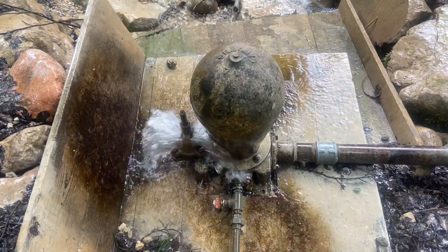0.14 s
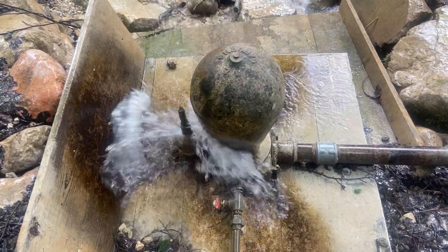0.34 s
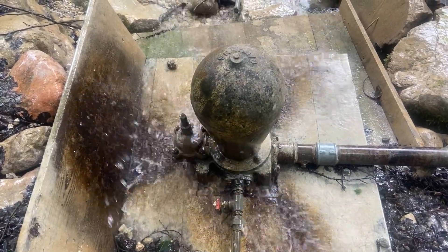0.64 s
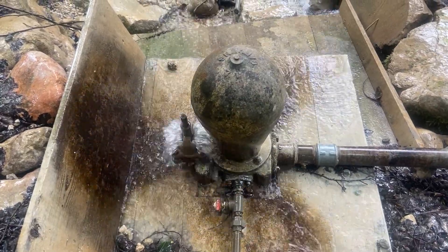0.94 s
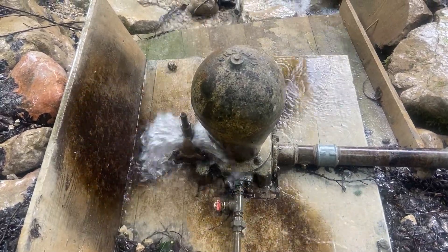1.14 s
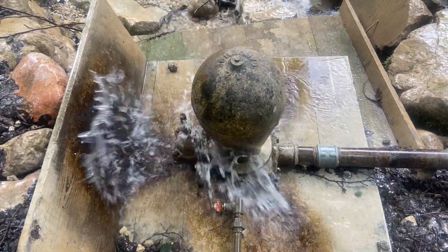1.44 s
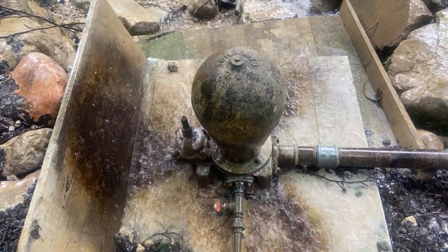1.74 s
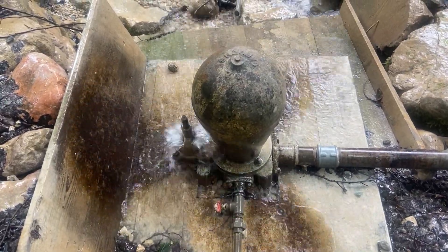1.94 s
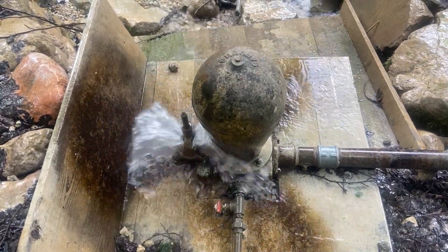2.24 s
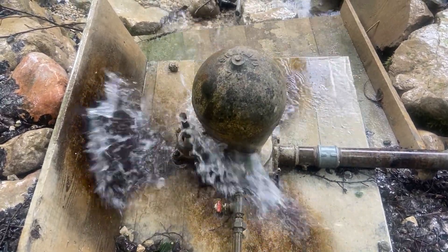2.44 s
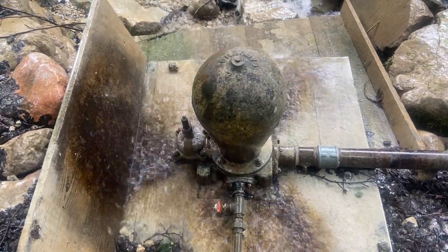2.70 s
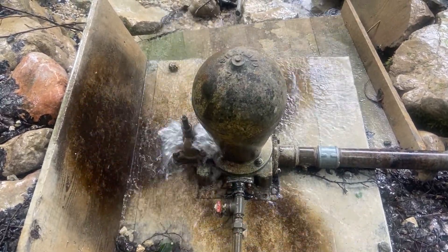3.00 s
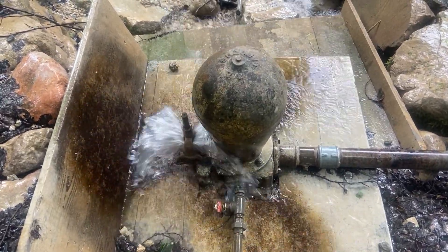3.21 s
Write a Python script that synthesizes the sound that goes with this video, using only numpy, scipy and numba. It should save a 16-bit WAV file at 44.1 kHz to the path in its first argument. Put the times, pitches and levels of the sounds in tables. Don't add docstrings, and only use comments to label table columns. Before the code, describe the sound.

A water ram pump knocks at about 0.34, 1.35 and 2.36 seconds: a chattering iron crack, short clanky ring, low board thud swelling just behind, and a duller rebound under a tenth of a second later. Spray patters after each slam; the gush dips, then builds from half a second on. Bright drops tick, small bubbles chirp, and a brook rushes steadily over low pipe rumble. Close, bright stereo phone pickup outdoors.

```python
import sys
import numpy as np
from scipy import signal
from scipy.fft import rfft, irfft
from scipy.io import wavfile
from scipy.ndimage import uniform_filter1d
from numba import njit

SR = 44100
rng = np.random.default_rng(int(sys.argv[2]) if len(sys.argv) > 2 else 0)


def volts_from_db(level):
    exponent = np.asarray(level, float) / 20
    return 10 ** exponent


def int16_out(signal):
    q = np.round(np.clip(np.atleast_2d(signal).T, -1, 1) * 32767)
    wavfile.write(sys.argv[1], SR, q.astype(np.int16))


N = 148176

# frequency in Hz, level in dB per Hz.
BROOK_SPECTRUM = [(25, -35), (62, -12.5), (140, -2), (330, -12), (700, -5), (1400, -9.5), (3500, -17),
                  (16000, -24.5)]
# frequency in Hz, width in Hz, level in dB.
PIPE_RUMBLE = [(68.9, 11, -45.5), (134, 32, -44.5)]
# start in seconds, peak in dB, frequency in Hz.
DROPS = [(0.0617, -26.5, 7110), (0.0957, -23, 6430), (0.2726, -22.5, 7430), (0.5646, -25, 6400),
         (0.7289, -26, 7400), (1.755, -18.5, 5300), (1.7893, -35, 6320), (2.0747, -32, 7740),
         (2.151, -26.5, 7000), (2.6512, -28, 7700), (2.6817, -26.5, 6700), (2.7142, -22, 7200),
         (2.838, -27, 6050), (3.2171, -26.5, 7280)]
# start in seconds, level in dB, frequency in Hz.
BUBBLES = [
    (.80, -37, 900),
    (1.43, -33, 3000),
    (1.78, -34, 750),
    (1.945, -34, 1080),
    (2.915, -36, 1100),
    (3.062, -31, 2030),
]
# start in seconds, level in dB, rebound in dB, iron in dB.
CLOSINGS = [
    (.338, -14.5, -11.5, -7),
    (1.346, -15.5, -11.5, -8),
    (2.358, -15.5, -11.5, -5.5),
]
# delay in seconds, level in dB.
CHATTER = [
    (0, 0),
    (.007, 4),
    (.024, -2),
    (.039, -8),
]
# frequency in Hz, level in dB, rise in seconds, T60 in seconds.
BOARD_MODES = [(67.7, -18, 0.014, 0.85), (119, -8.5, 0.029, 0.36), (145.9, -3, 0.027, 0.25),
               (184.8, -3.5, 0.01, 0.27), (244, -3, 0.025, 0.033), (328, -3, 0.01, 0.066),
               (451.7, -3.5, 0.005, .12), (596, -7.5, 0.01, 0.064), (681, 0, 0.0072, 0.05),
               (726, -1, 0.0077, 0.076)]
# frequency in Hz, level in dB, T60 in seconds.
IRON_MODES = [(887, -5, 0.06), (936, -2.5, 0.11), (1228, 1, 0.038), (1283, -0.5, 0.041),
              (1427, -3.5, 0.035), (1788, -5, 0.055), (1874, -9.5, 0.063), (2083, -3.5, 0.027),
              (2504, -8.5, 0.042), (2916, -12, 0.066), (3070, -13, 0.023), (4730, -19.5, 0.09)]
# frequency in Hz, gain in dB.
MIC = [(40, -2.5), (2800, -0.5), (3700, 0), (5000, 4.5), (7500, 11), (8600, 12.5), (10000, 1.5),
       (14500, -6.5)]
# frequency in Hz, phase in radians.
LEAD = [(3000, 0), (6300, -.3), (7200, 1.2), (8800, 3.1), (9700, 3.2), (11000, 6.2), (13400, 6.4),
        (15000, 9.4)]
# frequency in Hz, phase in radians.
WATER_LEAD = [(200, 0), (780, -.7), (1400, -3.1), (2000, -6.1), (3600, -6.4)]
# frequency in Hz, correlation from 0 to 1.
LIKENESS = [(60, 1), (250, 0.91), (700, 0.59), (1400, 0.34), (2800, 0.78), (5000, 0.3), (8500, 0.99),
            (13000, 0.28)]
# frequency in Hz, difference in dB.
LEFT_DB = [(200, -1.4), (600, -2.5), (1200, 0), (2500, -.8), (6000, 0)]

BROOK_DB, PLOP_DB, GURGLE_DB, GUSH_DB, SPRAY_DB = -35, -44.5, -42.5, -39.5, -40
CYCLE_S, GUSH_OPENS_S, GUSH_RISE_S, GUSH_FADE_S = 0.98, 0.5, 0.3, 0.27
SPRAY_PEAK_S, SPRAY_FLOOR_DB, WOBBLE_DB = 0.13, 1.5, 0.9
DROP_DB = -13
REBOUND_S, REBOUND_TILT_DB_PER_OCT, REBOUND_SOFTENING = 0.087, -1, 1.5
IRON_RISE_S, VARY_DB = 0.0025, 1.5
CRACK_DB, CRACK_T60_S = -4.5, 0.07
THUD_DB, THUD_RISE_S, THUD_T60_S, SHAKE_DB = -12, 0.018, 0.4, -10


def level(x, db):
    return x * volts_from_db(db) / np.sqrt(np.mean(x ** 2))


def curve(table, hz):
    table = np.array(table, float)
    return np.interp(np.log(hz + 1e-9), np.log(table[:, 0]), table[:, 1])


@njit
def svf(x, hz, width_hz):
    y, band, low = np.empty(len(x)), 0., 0.
    g, k = np.tan(np.pi * hz / SR), width_hz / hz
    for i in range(len(x)):
        v = (band + g * (x[i] - low)) / (1 + g * (g + k))
        band, low, y[i] = 2 * v - band, low + 2 * g * v, k * v
    return y


def band_noise(hz, width_hz):
    return svf(rng.standard_normal(N), float(hz), float(width_hz))


@njit
def rings(at_s, hz, size, t60_s, rise_s, glide, n):
    y = np.zeros(n)
    for e in range(len(at_s)):
        i, phase = int(at_s[e] * SR), 0.
        for j in range(min(int((t60_s[e] + rise_s[e]) * SR), n - i)):
            t = j / SR
            u = min(t / rise_s[e], 1.)
            phase += 2 * np.pi * hz[e] * (1 + glide * t / t60_s[e]) / SR
            if i + j >= 0:
                decay = np.exp(-6.9 * max(t - rise_s[e], 0.) / t60_s[e])
                y[i + j] += size[e] * u * u * (3 - 2 * u) * decay * np.sin(phase)
    return y


def walk(rate_hz):
    k = int(SR / rate_hz)
    steps = np.repeat(rng.standard_normal(N // k + 1), k)
    return 1.3 * uniform_filter1d(uniform_filter1d(steps, k), k)[:N]


def grains(count, lo_hz, hi_hz, cycles, scatter_db, glide, flow):
    when, pitch, rarity, sign = rng.random((count, 4)).T
    at_s, hz = when * (N - 1) / SR, lo_hz * (hi_hz / lo_hz) ** pitch
    size = volts_from_db(-scatter_db * np.log(rarity + 0.0075)) * flow[(at_s * SR).astype(int)] * np.sign(sign - .5)
    return rings(at_s, hz, size, cycles / hz, 1 / hz, glide, N)


def since_closing():
    t = np.arange(N) / SR
    first_s = CLOSINGS[0][0]
    at_s = np.array([first_s - 2 * CYCLE_S, first_s - CYCLE_S] + [row[0] for row in CLOSINGS])
    return t - at_s[np.searchsorted(at_s, t, side="right") - 1]


def after(at_s):
    return np.maximum(np.arange(N) / SR - at_s, 0)


def brook():
    rush, swell = 0, walk(1.4)
    for hz in 25 * 2 ** np.arange(0, 9.4, 1 / 3):
        gain = volts_from_db(curve(BROOK_SPECTRUM, hz) + 0.3 * swell + 1.1 * walk(25.1))
        rush = rush + gain * svf(band_noise(hz, hz / 3), hz, hz / 2)
    rumble = sum(level(band_noise(hz, width_hz), db) for hz, width_hz, db in PIPE_RUMBLE)
    return level(rush, BROOK_DB) + rumble


def plops():
    flow = volts_from_db(1.8 * walk(9.7))
    return level(grains(260, 519.0, 5930.0, cycles=54.0, scatter_db=3.0, glide=0.19, flow=flow), PLOP_DB)


def gurgle():
    flow = volts_from_db(0.7 * walk(4.63))
    return level(grains(1200, 240.0, 1297.0, cycles=18., scatter_db=1.5, glide=0.32, flow=flow), GURGLE_DB)


def gush():
    t = since_closing()
    build = 1 - np.exp(-np.maximum(t - GUSH_OPENS_S, 0) / GUSH_RISE_S)
    flow = (build + np.exp(-t / GUSH_FADE_S)) * volts_from_db(2.1 * WOBBLE_DB * walk(25))
    return level(grains(8000, 752.0, 3500., cycles=8.0, scatter_db=5.0, glide=0.13, flow=flow), GUSH_DB)


def spray():
    t = since_closing()
    burst = t / SPRAY_PEAK_S * np.exp(1 - t / SPRAY_PEAK_S) + volts_from_db(SPRAY_FLOOR_DB)
    flow = burst * volts_from_db(WOBBLE_DB * walk(25))
    return level(grains(20000, 2965.0, 16700.0, cycles=6.7, scatter_db=2.6, glide=0.13, flow=flow), SPRAY_DB)


def water():
    return brook() + plops() + gurgle() + gush() + spray()


def drops():
    at_s, db, hz = np.repeat(np.array(DROPS, float), 9, axis=0).T
    lag, detune = rng.standard_normal((len(at_s), 2)).T
    at_s, hz = at_s + 0.00065 * abs(lag), hz * np.exp(0.157 * detune)
    return rings(at_s, hz, volts_from_db(db + DROP_DB), 0 * at_s + 0.014, 0 * at_s + 0.00066, 0.085, N)


def bubbles():
    at_s, db, hz = np.array(BUBBLES, float).T
    return rings(at_s, hz, volts_from_db(db), 0 * at_s + .08, 0 * at_s + .008, .06, N)


def shocks():
    out = []
    for at_s, db, back_db, iron_db in CLOSINGS:
        out.append((at_s, db, iron_db, 0, 1))
        out.append((at_s + REBOUND_S, db + back_db, iron_db, REBOUND_TILT_DB_PER_OCT, REBOUND_SOFTENING))
    return out


def thud():
    envelope = np.zeros(N)
    for at_s, db, _, _ in CLOSINGS:
        t = after(at_s)
        envelope += volts_from_db(db - 60 * t / THUD_T60_S) * (1 - np.exp(-(t / THUD_RISE_S) ** 2))
    low = level(svf(band_noise(163, 230), 163.0, 230.0), 0)
    return volts_from_db(THUD_DB) * envelope * (low + level(band_noise(560, 760), SHAKE_DB))


def crack():
    envelope = np.zeros(N)
    for at_s, db, _, tilt, _ in shocks():
        for lag_s, hit_db in CHATTER:
            t = after(at_s + lag_s)
            envelope += volts_from_db(db + hit_db + 6.5 * tilt) * (t > 0) * volts_from_db(-60 * t / CRACK_T60_S)
    return volts_from_db(CRACK_DB) * envelope * (band_noise(1500, 2800) + volts_from_db(-12) * band_noise(9700, 4000))


def boards_and_iron(vary_db, turn_cycles):
    rows = []
    for at_s, db, iron_db, tilt, soft in shocks():
        for hz, mode_db, rise_s, t60_s in BOARD_MODES:
            rows.append((at_s, hz, db + mode_db + tilt * np.log2(hz / 150), t60_s, rise_s * soft))
        for lag_s, hit_db in CHATTER:
            for hz, mode_db, t60_s in IRON_MODES:
                ring_db = db + hit_db + mode_db + iron_db + tilt * np.log2(hz / 150)
                rows.append((at_s + lag_s, hz, ring_db, t60_s, IRON_RISE_S * soft))
    at_s, hz, db, t60_s, rise_s = np.array(rows).T
    detune, vary, turn = rng.standard_normal((len(rows), 3)).T
    at_s = at_s + turn_cycles * turn / hz
    return rings(at_s, hz * (1 + 0.0075 * detune), volts_from_db(db + vary_db * vary), t60_s, rise_s, 0., N)


def knocks(vary_db, turn_cycles):
    return boards_and_iron(vary_db, turn_cycles) + crack() + thud()


def ports(same, other, lead):
    hz = np.arange(N // 2 + 1) * SR / N
    like, turn = np.clip(curve(LIKENESS, hz), 0, 1), np.exp(.5j * lead(hz))
    lean = volts_from_db(curve(LEFT_DB, hz) / 2)
    mid, side = rfft(same) * np.sqrt((1 + like) / 2), rfft(other) * np.sqrt((1 - like) / 2)
    return irfft(np.array([(mid + side) * turn * lean, (mid - side) / turn / lean]), N)


def scene():
    around = ports(water(), water(), lambda hz: curve(LEAD, hz) + curve(WATER_LEAD, hz))
    close = drops() + bubbles() + knocks(VARY_DB, 0.035)
    return around + ports(close, knocks(1.3, 0.45), lambda hz: curve(LEAD, hz))


def top_cut(x):
    return signal.sosfilt(signal.butter(12, 15760, fs=SR, output="sos"), x)


def record(dry):
    hz = np.arange(N // 2 + 1) * SR / N
    mix = irfft(rfft(dry) * volts_from_db(curve(MIC, hz)), N)
    return top_cut(mix)


dry = scene()
out = record(dry)
int16_out(out)
```